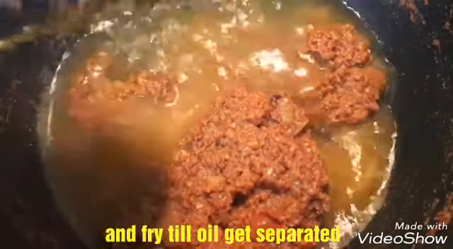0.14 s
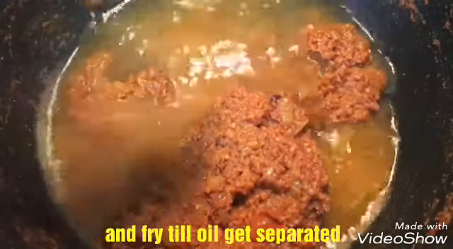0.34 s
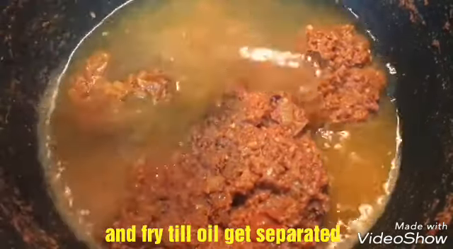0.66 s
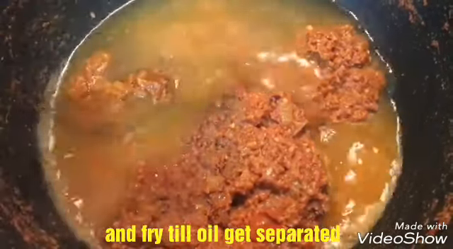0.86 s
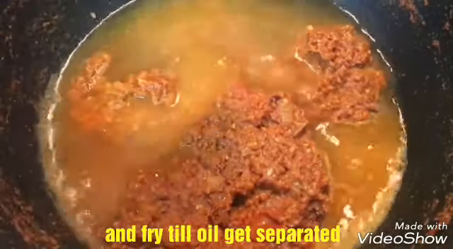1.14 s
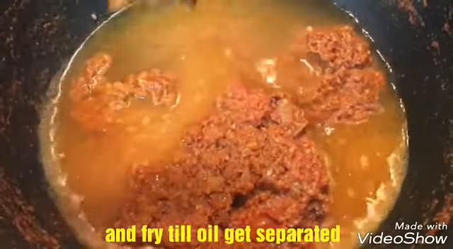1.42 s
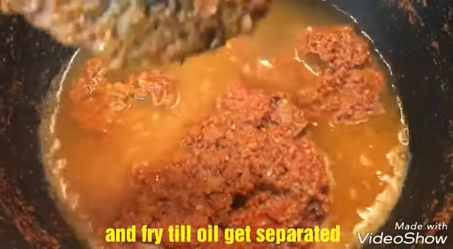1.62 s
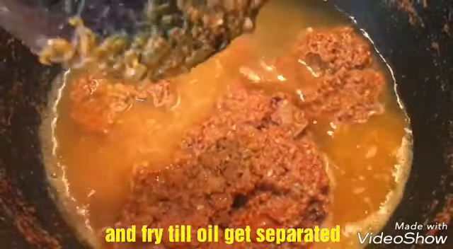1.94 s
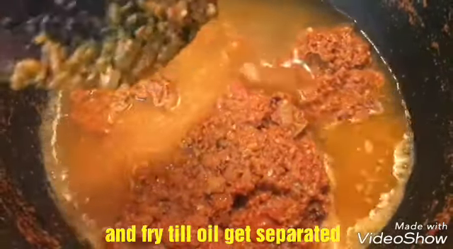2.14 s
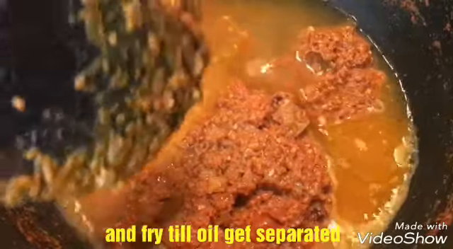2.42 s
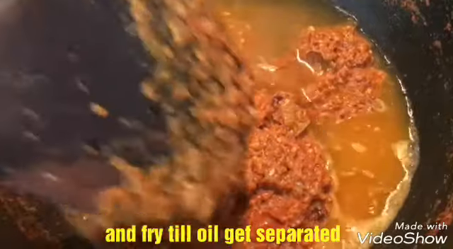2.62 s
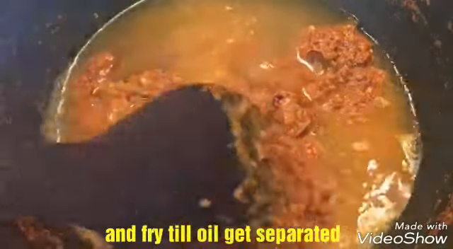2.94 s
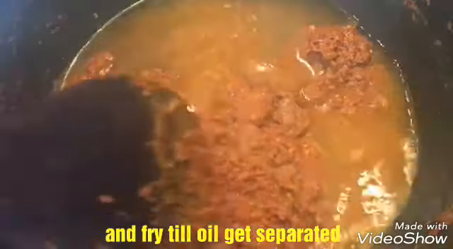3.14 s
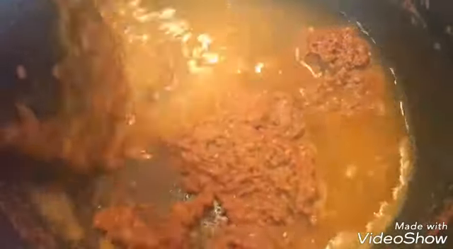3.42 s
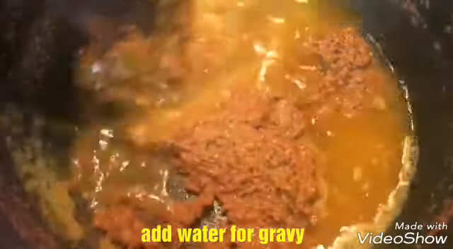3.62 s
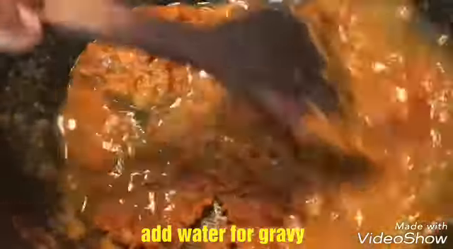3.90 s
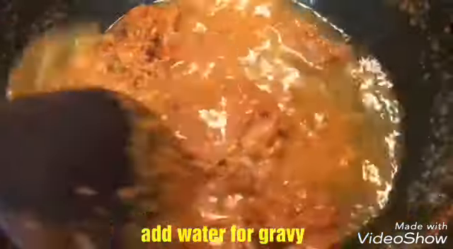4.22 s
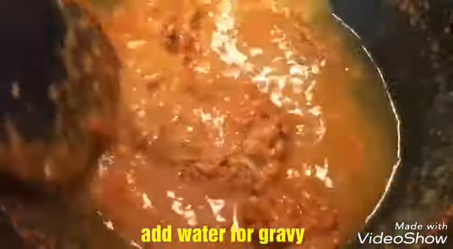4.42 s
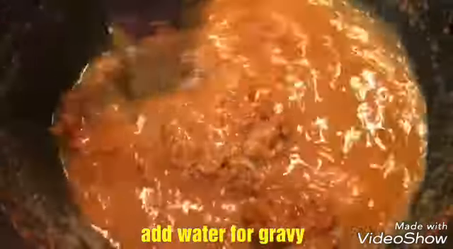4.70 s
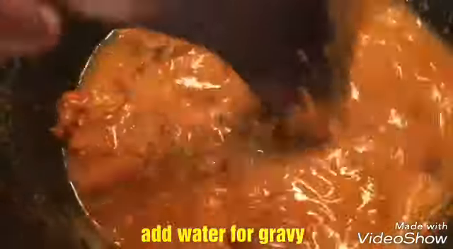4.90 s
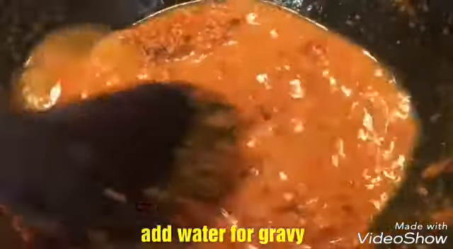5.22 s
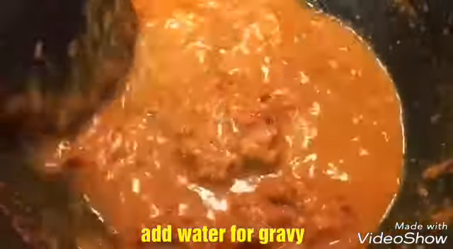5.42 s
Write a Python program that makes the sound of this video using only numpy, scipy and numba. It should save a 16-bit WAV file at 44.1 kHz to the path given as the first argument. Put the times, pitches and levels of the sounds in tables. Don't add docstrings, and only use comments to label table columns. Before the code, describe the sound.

A lively close-up sizzle of boiling, oily gravy gradually eases, with popping droplets, a single hard wooden knock and soft spoon bumps.

```python
import sys
import numpy as np
from scipy import signal
from scipy.fft import rfft, irfft
from scipy.io import wavfile
from scipy.ndimage import uniform_filter1d
from numba import njit

SR = 44100
rng = np.random.default_rng(int(sys.argv[2]) if len(sys.argv) > 2 else 0)


def attenuation_scalar(level_db):
    decades = np.asarray(level_db, float) / 20
    return 10 ** decades


def store_pcm(level_fs):
    pcm = np.round(np.clip(level_fs, -1, 1) * 32767).astype(np.int16)
    wavfile.write(sys.argv[1], SR, np.atleast_2d(pcm).T)


N = 244755


def level(x, db):
    return x * attenuation_scalar(db) / np.sqrt(np.mean(x ** 2))


def samples(s):
    return (s * SR).astype(np.int64)


def butter(x, order, hz, kind):
    return signal.sosfilt(signal.butter(order, hz, kind, fs=SR, output="sos"), x)


def colour(x, points, peaks=()):
    f = np.arange(2049) * SR / 4096 + 1
    points_hz, points_db = np.transpose(points)
    db = np.interp(np.log(f), np.log(points_hz), points_db)
    db += sum(g / (1 + (2 * (f - hz) / width) ** 2) for hz, width, g in peaks)
    cepstrum = irfft(db * np.log(10) / 20)
    cepstrum[1:2048] *= 2
    cepstrum[2049:] = 0
    response = irfft(np.exp(rfft(cepstrum)))
    return signal.fftconvolve(x, response)[:len(x)]


def walk(rate):
    hold = int(SR / rate)
    steps = np.repeat(rng.standard_normal(N // hold + 1), hold)
    return 1.36 * uniform_filter1d(uniform_filter1d(steps, hold), hold)[:N]


@njit
def rings(start, hz, t60, size, glide):
    out = np.zeros(N)
    for k in range(len(start)):
        n = int(t60[k] * SR) + 2
        z = size[k] + 0j
        p = np.exp((2j * np.pi * hz[k] - np.log(1000) / t60[k]) / SR)
        turn = np.exp(2j * np.pi * hz[k] * (glide - 1) / SR / n)
        for i in range(start[k], min(start[k] + n, N)):
            out[i] += z.imag
            z *= p
            p *= turn
    return out


def play(x, centres_hz, gains_db, flicker_db, rate):
    spectrum, f = rfft(x), np.log(np.arange(N // 2 + 1) * SR / N + 1)
    out = 0
    for one, db in zip(np.eye(len(centres_hz)), gains_db):
        band = irfft(spectrum * np.interp(f, np.log(centres_hz), one), N)
        out = out + band * attenuation_scalar(db + flicker_db * walk(rate))
    return out


def swells(events, centres_hz, spread_oct):
    t = np.arange(N) / SR
    total = 0
    for s, db, hz, half_s in events:
        octaves = np.log2(np.divide(centres_hz, hz))
        in_pitch = np.exp(-.5 * (octaves / spread_oct) ** 2)
        in_time = np.exp(-.5 * ((t - s) / half_s) ** 2)
        total = total + np.outer(in_pitch, db * in_time)
    return total


# time_s [s], vigour_db [dB]
BOIL = [(0, -31), (.29, -31.5), (.38, -30), (.55, -31.5), (1.45, -33.5), (2.1, -34.5), (2.74, -35.5),
        (3.05, -39), (3.37, -32.5), (3.47, -34.5), (4.14, -32.5), (4.17, -38.5), (4.38, -34), (4.5, -35),
        (4.8, -35), (5.14, -41.5), (5.3, -41), (5.55, -40)]


def vigour():
    return np.interp(np.arange(N) / SR, *np.transpose(BOIL))


def walls(x, count=10):
    lags = (SR * (.0006 + .012 * rng.random(count) ** 2)).astype(int)
    return x + sum(attenuation_scalar(-21) * walk(11) * np.roll(x, lag) for lag in lags)


# pitch_hz [Hz], level_db [dB per Hz]
PAN = [(210, -37.5), (350, -13.5), (471, -12.5), (731, -3.5), (1100, -9.5), (1440, -1), (2650, -5),
       (2880, -4), (6830, -6.5), (10300, -6.5), (13400, -23), (22000, -120)]
# pitch_hz [Hz], width_hz [Hz], gain_db [dB]
HOLLOW = [(1480, 190, 1.5), (1804, 180, -3.5), (2270, 100, 1), (3200, 91, -1), (4930, 300, -3),
          (5760, 260, 2.5), (6930, 260, 3), (7630, 290, -3), (9040, 600, 1), (10180, 230, -3.5),
          (400, 120, -6), (1100, 150, -1)]
SWARM_HZ = [720, 1450, 3000, 7000]
SWARM_FOLLOWS = [.3, .35, .75, 1.02]
SWARM_DB = [-0.94, -0.95, -0.25, 0.26]
# middle_s [s], gain_db [dB], pitch_hz [Hz],
# half_length_s [s]
SURGES = [(.001, 11, 1290, 0.022), (.38, 0, 1450, 0.044), (.68, 1, 1300, .03), (.8, 2, 6000, .04),
          (1.02, 2.5, 3500, 0.033), (1.25, 2, 7000, .02), (1.3, -3, 6000, .02), (1.38, 3.5, 3000, 0.043),
          (1.8, 1.5, 1500, 0.14), (1.63, 3, 3470, .03), (1.81, 2.5, 7000, .03), (2.3, 1.5, 7000, 0.058),
          (2.45, 3, 720, 0.034), (2.52, 2, 2980, 0.035), (2.8, 1.5, 7000, 0.019), (2.89, 2, 5000, 0.016),
          (3.09, 5, 1600, .035), (3.39, 2.5, 3000, .03), (3.74, 2.5, 716, .08), (4.0, 2, 2700, .075),
          (4.09, 3, 1300, 0.047), (4.21, -5, 4300, .04), (4.4, 5, 2200, 0.032), (4.35, 4, 920, 0.43),
          (4.53, 7.5, 810, 0.056), (4.8, 9, 736, 0.097), (5.04, 5, 900, 0.055), (5.2, 3, 1450, 0.032),
          (5.45, 7.5, 716, 0.06), (5.52, 3.5, 1150, 0.039)]


def sizzle(count=60000):
    when, pitch, big, sign = rng.random((count, 4)).T
    start = (when * N).astype(np.int64)
    hz = 350 + 10300 * pitch ** 1.5
    rarity = np.minimum(-np.log(1 - big), 6)
    t60 = (10.0 / hz + 0.0027) * (1 + 0.49 * rarity)
    even = (pitch + .01) ** .25 / (10 / hz + .003)
    size = np.sign(sign - .5) * attenuation_scalar(0.4 * rarity) * even
    bubbles = rings(start, hz, t60, size, 1.035)
    steam = rng.standard_normal(N)
    mix = walls(level(bubbles, 0) + level(steam, -0.83))
    mix = level(colour(mix, PAN, HOLLOW), -32)
    boil_db = vigour()
    swarms_db = np.outer(SWARM_FOLLOWS, boil_db - np.median(boil_db)) + np.c_[SWARM_DB]
    swarms_db = swarms_db + swells(SURGES, SWARM_HZ, 0.58)
    flutter_db = 0.15 * walk(12) + .5 * walk(40)
    return play(mix, SWARM_HZ, swarms_db, 0.51, 16) * attenuation_scalar(flutter_db)


# pitch_hz [Hz], level_db [dB per Hz]
ROOM = [(15, -58), (25, -23), (70, -5.5), (97, -1.5), (166, -6), (188, -2.5), (271, -6), (356, -3.5),
        (464, -14.5), (500, -12.5), (650, -34), (1100, -120)]
# middle_s [s], gain_db [dB], pitch_hz [Hz], half_length_s [s]
STOVE = [(.15, 2, 260, .1), (.38, 3, 180, .05), (.55, -3, 100, .1), (2.1, -2.5, 260, .3),
         (2.02, 2, 100, .04), (1.55, 10.5, 160, 0.2), (2.46, 7, 160, 0.043), (2.78, 2, 100, 0.061),
         (3.3, 4, 200, .1), (3.6, -3, 150, 0.082), (3.85, 5.5, 260, .08), (4.2, 4, 200, 0.072),
         (4.4, 4, 200.3, 0.1), (4.63, 5, 260, .04), (4.7, 9, 100, .04), (4.83, 10.5, 260, 0.061),
         (5.14, 7, 100.1, .05), (5.24, 5.5, 220, 0.046), (5.53, 5.5, 260, 0.034)]
STOVE_REST_DB = [-1.5, -2]


def room():
    centres_hz = [100, 260]
    shake_db = swells(STOVE, centres_hz, 0.65) + np.c_[STOVE_REST_DB]
    hum = level(colour(rng.standard_normal(N), ROOM), -55.0)
    return play(hum, centres_hz, shake_db, 1.8, 5.59)


# start_s [s], peak_db [dB], pitch_hz [Hz], t60_s [s]
PLOPS = [
    (.002, -37, 1640, 0.029),
    (.009, -22.5, 1480, 0.031),
    (.042, -30, 1060, 0.044),
    (1.633, -26.5, 1530, 0.024),
    (1.883, -29.5, 1420, 0.057),
    (4.662, -31, 744, 0.074),
    (4.876, -30.5, 1225, 0.092),
    (5.025, -35, 1360, .04),
]


def plops():
    s, db, hz, t60 = np.transpose(PLOPS)
    return rings(samples(s), hz, t60, attenuation_scalar(db), 1.12)


# start_s [s], peak_db [dB], pitch_hz [Hz]
SPITS = [(0.0875, -17, 6400), (0.106, -16, 9800), (0.208, -13, 10000), (0.4355, -14, 8800),
         (0.6454, -17, 2100), (0.7052, -17, 2100), (0.8007, -17, 3900), (1.0191, -17, 3900),
         (1.14, -17, 3900), (1.2418, -17, 3700), (1.5239, -14, 5100), (1.5888, -17, 3800),
         (1.8083, -17, 7000), (2.3606, -19, 6500), (2.7011, -19, 2100), (3.2916, -17, 6500),
         (3.3155, -16, 6700), (3.371, -14, 2100), (3.4181, -16, 4500), (3.4937, -16, 2100),
         (3.5556, -17, 3000), (3.727, -17, 6100), (3.7606, -17, 3500), (3.8159, -15, 10000),
         (3.9368, -16, 2100), (4.0191, -18, 3500), (4.3717, -18, 3200), (4.4879, -18, 7600),
         (4.5582, -18, 8900), (4.7417, -13, 6500)]


def spits():
    small_per_s, over_boil_db, scatter_db = 14, 11, 2
    when, pitch, size = rng.random((int(small_per_s * N / SR), 3)).T
    at = (when * N).astype(np.int64)
    small_db = vigour()[at] + over_boil_db + 2 * scatter_db * (size - .5)
    small = [at / SR, small_db, 2000 * 5 ** pitch]
    s, db, hz = np.hstack([np.transpose(SPITS), small])
    hz = np.clip(hz, 3600, 6500)
    cracks = rings(samples(s), hz, 2.4 / hz, -attenuation_scalar(db + 8.5), 1.2)
    return butter(cracks, 1, 1400, "high")


# pitch_hz [Hz], level_db [dB], t60_s [s]
BOARD = [(119, -21, 0.17), (214, -12.5, 0.37), (300, 1.5, 0.12), (637, 3, 0.11), (880, -2, 0.18),
         (968, -1, 0.23), (1042, -10, 0.19), (1047, -4.5, 0.36), (1150, 1, 0.275), (1227, -5.5, 0.34),
         (1330, -21, 0.18), (1540, 3, 0.088), (1688, -2.5, .12), (2120, -9, 0.065), (1265, -6, 0.27),
         (1000, -3, 0.24), (1930, -12, .05), (2250, -1, 0.028)]
# pitch_hz [Hz], level_db [dB per Hz]
CRACK = [(59, -48), (100, -11), (241, -3.5), (779, -2), (1100, -4), (2140, -11), (2640, -27), (3500, -36),
         (4550, -62), (7700, -120)]
# pitch_hz [Hz], level_db [dB per Hz]
KNOCK_TAIL = [(35, -27), (60, -13.5), (155, -1.5), (378, -8.5), (685, 0.5), (752, -6), (1240, 2),
              (1800, -24), (2210, -6.5), (2500, -30), (3250, -47), (5500, -120)]


def knock():
    knock_s, knock_db = 1.3583, -23
    crack_db, crack_t60_s = -14, .06
    tail_db, tail_t60_s = -23, .55
    hz, db, t60 = np.transpose(BOARD)
    start = np.full(len(hz), int(knock_s * SR))
    flip = (-1.) ** np.arange(len(hz))
    ring = rings(start, hz, t60, attenuation_scalar(db + knock_db) * flip, 0.93)
    age = np.clip(np.arange(N) / SR - knock_s, 0, None)
    rise = 1 - np.exp(-age / .002)
    crack = level(colour(rng.standard_normal(N), CRACK, [(426, 140, -12)]), crack_db)
    crack = crack * attenuation_scalar(-60 * age / crack_t60_s)
    tail = colour(rng.standard_normal(N), KNOCK_TAIL, [(400, 77, -5), (1160, 300, 2.5)])
    tail = level(tail, tail_db) * attenuation_scalar(-60 * age / tail_t60_s)
    return ring + rise * (crack + tail)


# start_s [s], peak_db [dB], pitch_hz [Hz], t60_s [s]
BUMPS = [
    (1.438, -29, 127.3, 0.14),
    (2.449, -43, 239, 0.15),
    (4.159, -37, 110, 0.15),
    (4.66, -38, 100, .12),
    (4.649, -34, 508, 0.12),
    (4.797, -35, 500, 0.14),
    (5.204, -41, 239.5, 0.25),
]


def bumps():
    s, db, hz, t60 = np.transpose(BUMPS)
    start = samples(s)
    thud = rings(start, hz, t60, attenuation_scalar(db - 4.0), 1.0)
    thud = thud + rings(start, 2.3 * hz, 1.5 * t60, attenuation_scalar(db - 8.5), 1.0)
    rough = uniform_filter1d(thud * (1 + .35 * walk(300)), size=24)
    return butter(rough, 2, 70, "high")


# middle_s [s], level_db [dB], centre_hz [Hz], width_hz [Hz], half_length_s [s]
SPURTS = [(3.414, -35, 3600, 2300, 0.052), (3.592, -38.5, 2160, 600, 0.046), (3.96, -35, 3000, 1400, .05),
          (4.05, -36, 3300, 2000, 0.016), (4.393, -31.5, 2500, 1400, 0.011), (1.92, -41.5, 1660, 600, .02),
          (5.47, -45, 1100, 300, .07), (3.55, -40, 2500, 600, .02), (3.8, -39, 2500, 1200, .05),
          (3.25, -40, 3000, 2500, .08), (4.736, -39, 2300, 900, 0.0091), (4.741, -31.5, 5800, 5000, 0.01),
          (1.524, -32, 5000, 3600, 0.0053), (1.927, -31.5, 6200, 3600, 0.016)]


def spurts():
    out, hiss = 0, rng.standard_normal(N)
    for s, db, hz, width, half_s in SPURTS:
        jet = butter(hiss, 2, [hz - width / 2, hz + width / 2], "band")
        swell = np.exp(-.5 * ((np.arange(N) / SR - s) / half_s) ** 2)
        out = out + level(jet, db) * swell
    return out


def scene():
    mono = sizzle() + room() + plops() + spits() + knock() + bumps() + spurts()
    return np.array([mono, mono])


def roll_off(x):
    return signal.sosfilt(signal.butter(12, 10810, fs=SR, output="sos"), x)


# middle_s [s], low_hz [Hz], high_hz [Hz]
SPLIT = [
    (.485, 4600, 5700),
    (.485, 8200, 9700),
    (1.415, 100, 10300),
    (4.59, 4200, 5200),
    (4.87, 5200, 6900),
]


def record(dry):
    x = signal.sosfilt(signal.ellip(12, .2, 90, 10250, fs=SR, output="sos"), dry)
    for edges_hz, db in (([10310, 10450], -6), ([10560, 10680], -5), ([10720, 10820], -6)):
        patches = uniform_filter1d(1. * (walk(16) > .05), size=400)
        narrow = signal.ellip(5, .5, 80, edges_hz, "band", fs=SR, output="sos")
        x = x + attenuation_scalar(db) * patches * signal.sosfilt(narrow, dry)
    side = 0
    borrowed = np.roll(x[0], 9000)
    for s, *edges_hz in SPLIT:
        window = np.clip(2 - np.abs(np.arange(N) / SR - s) / .011, 0, 1)
        side = side + window * butter(borrowed, 4, edges_hz, "band")
    mix = x + attenuation_scalar(-11.5) * np.array([side, -side])
    return roll_off(mix)


dry = scene()
out = record(dry)
store_pcm(out)
```